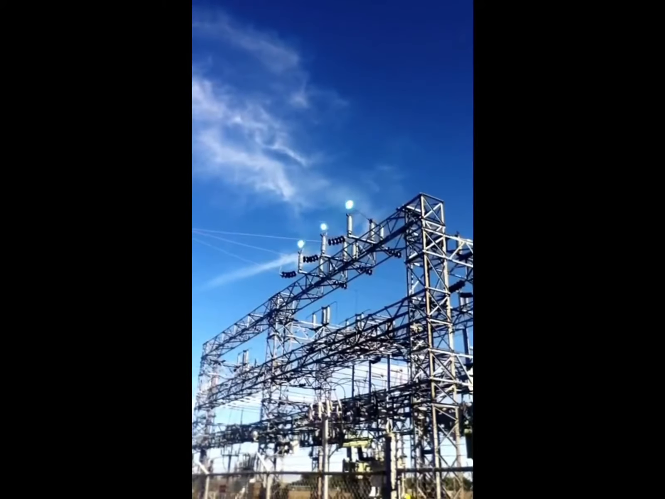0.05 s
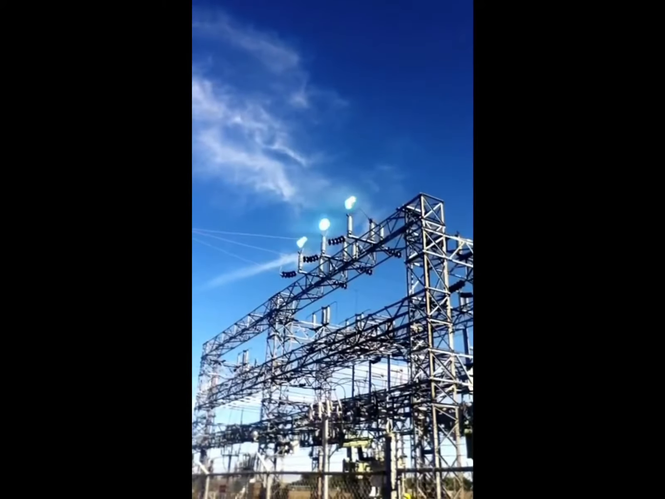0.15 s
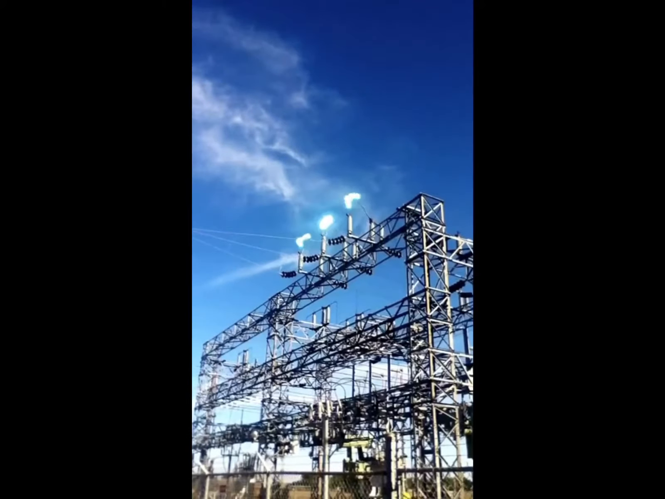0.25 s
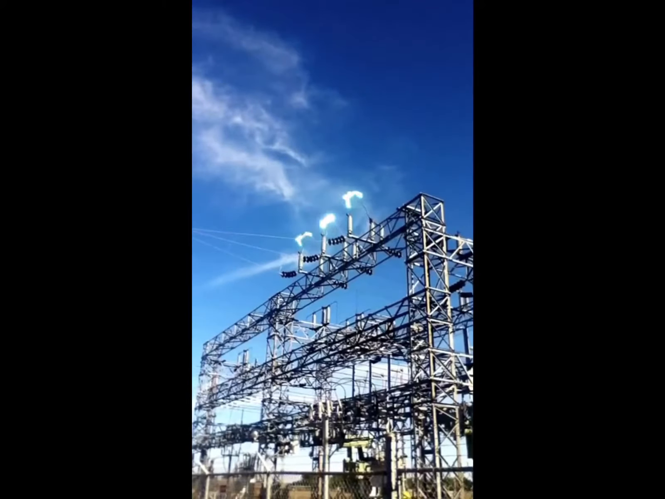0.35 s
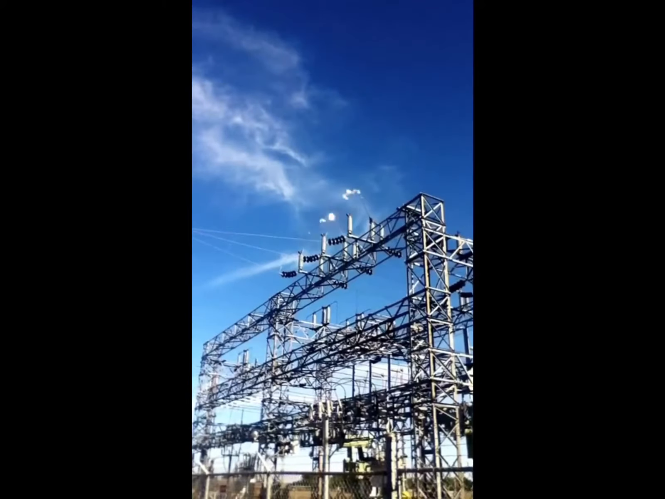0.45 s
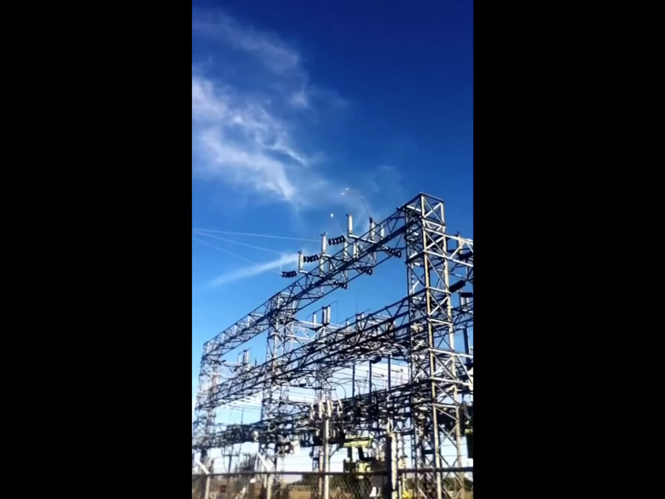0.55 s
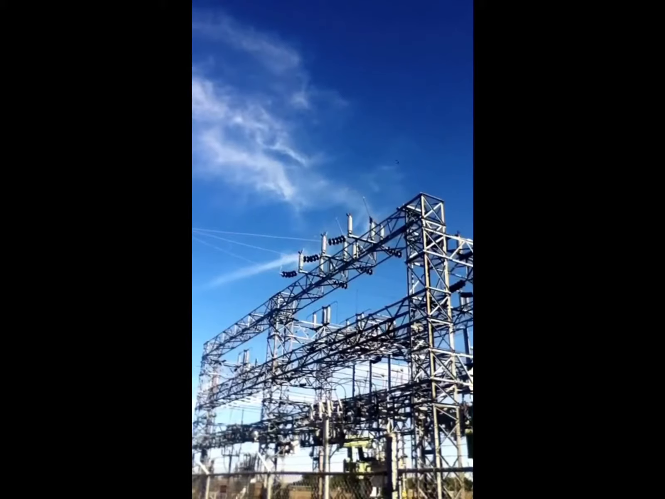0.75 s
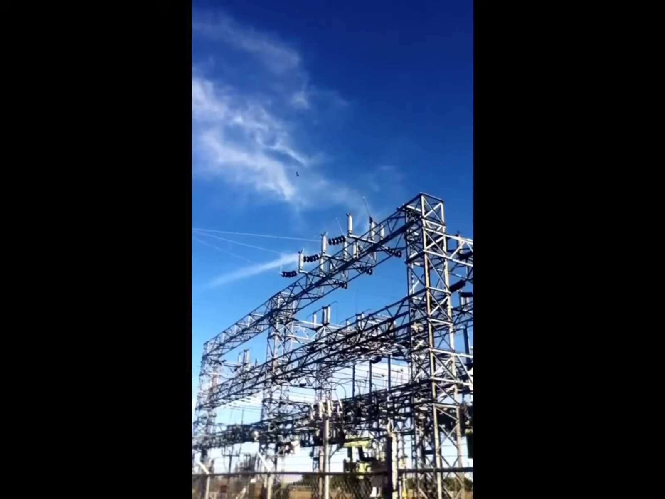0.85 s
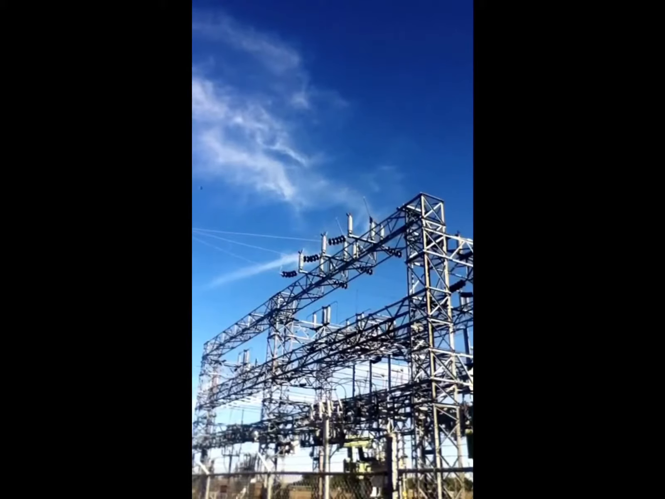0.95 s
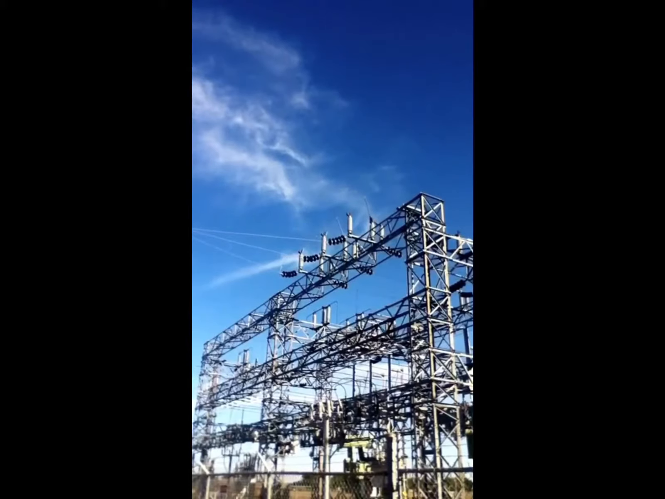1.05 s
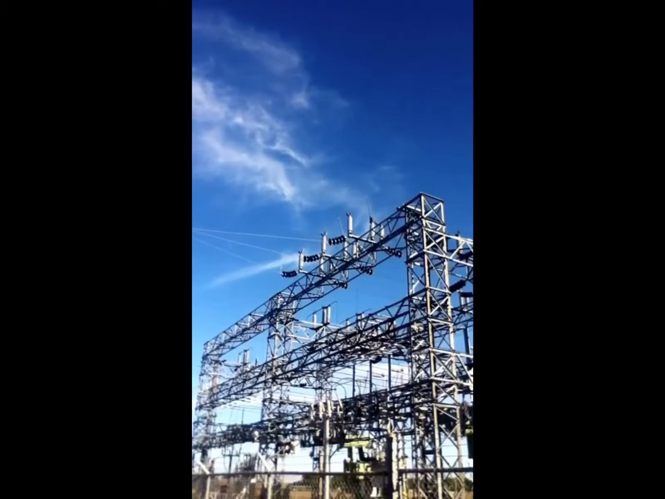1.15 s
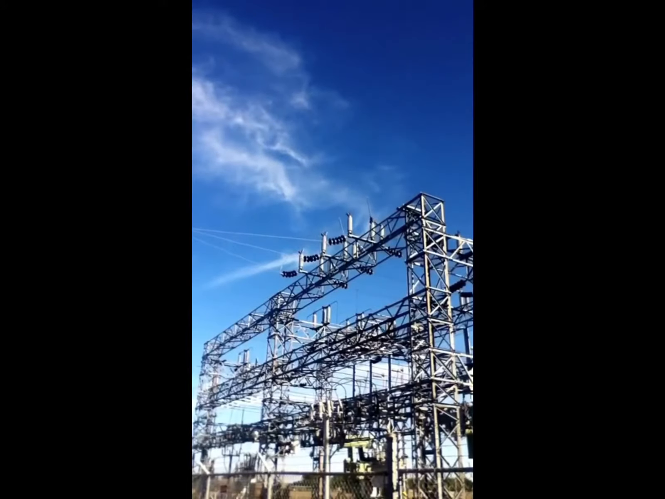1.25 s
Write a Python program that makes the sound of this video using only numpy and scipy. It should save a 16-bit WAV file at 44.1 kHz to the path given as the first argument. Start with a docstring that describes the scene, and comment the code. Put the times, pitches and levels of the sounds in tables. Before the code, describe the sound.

An electric arc crackles, swells into a loud buzz and snaps off outdoors.

```python
"""An electric arc, drawn by a high-voltage switch opening on top of an outdoor substation.
The gap whistles, strikes and crackles. As the arc lengthens, each surge of current heats the air,
giving a loud buzz at twice the mains frequency and a sizzle that pulses once a cycle. The arc falters
and snaps off; its echoes and a few last sparks die away over quiet outdoor noise."""
import sys
import numpy as np
from scipy import signal
from scipy.fft import rfft, irfft
from scipy.io import wavfile
from scipy.ndimage import uniform_filter1d, map_coordinates

SR = 44100
rng = np.random.default_rng(int(sys.argv[2]) if len(sys.argv) > 2 else 0)


def store_pcm(level_fs):
    """Save levels as 16-bit WAV."""
    pcm = np.round(np.clip(level_fs, -1, 1) * 32767).astype(np.int16)
    wavfile.write(sys.argv[1], SR, np.atleast_2d(pcm).T)


N = 57330
BUZZ_HZ, STRIKE_S, OUT_S = 119.8, .2035, .775  # surge rate; the arc's ignition and extinction
STRIKE_WIDTH_HZ = 2800


def undb(db):
    """Decibels to amplitude ratio."""
    return 10 ** (np.asarray(db) / 20)


def clock():
    """Sample times in seconds."""
    return np.arange(N) / SR


def unit(x):
    """Normalisation to rms 1."""
    return x / np.sqrt(np.mean(x ** 2))


def swell(curve):
    """Amplitude envelope through (time [s], level [dB]) points, zero outside them."""
    t = clock()
    s, db = np.array(curve).T
    return np.where((t >= s[0]) & (t <= s[-1]), undb(np.interp(t, s, db)), 0)


def colour(x, points):
    """Minimum-phase filter through (frequency [Hz], gain [dB]) points."""
    hz, db = np.array(points).T
    size = 2048
    freqs = np.maximum(np.arange(size // 2 + 1) * SR / size, 1)
    gain = undb(np.interp(np.log(freqs), np.log(hz), db))
    cepstrum = irfft(np.log(gain))
    cepstrum[1:size // 2] *= 2  # folding makes the response causal
    cepstrum[size // 2 + 1:] = 0
    return signal.fftconvolve(x, irfft(np.exp(rfft(cepstrum))))[:N]


def band(x, hz, width):
    """Two equal resonators in cascade, scaled to rms 1."""
    b, a = signal.iirpeak(hz, hz / width, fs=SR)
    return unit(signal.lfilter(b, a, signal.lfilter(b, a, x)))


def walk(hz):
    """Smooth random modulation of rms 1."""
    k = max(int(SR / hz), 2)
    steps = np.repeat(rng.standard_normal(N // k + 1), k)
    return unit(uniform_filter1d(steps, k))[:N]


def background():
    """Ambient noise: quiet outdoor air, a fading distant rush and a faint high pure tone."""
    # spectra of the air and the rush (frequency [Hz], gain [dB])
    air_colour = [(25, -30), (55, -5.5), (150, 0.5), (520, -7.5), (1150, -7), (1550, -13.5), (2100, -20),
                  (4000, -21), (4800, -14), (6000, -22.5), (15000, -30.5)]
    rush_colour = [(40, -25.5), (320, 1.5), (500, -6), (1200, -5.5), (2000, -17), (10000, -44)]
    # envelope of the rush (time [s], level [dB])
    rush_level = [(0, -37.5), (.12, -42), (.3, -39), (1.3, -66)]
    t = clock()
    air = unit(colour(rng.standard_normal(N), air_colour)) * undb(-47 + .5 * walk(12.41))
    rush = unit(colour(rng.standard_normal(N), rush_colour))
    rush *= undb(np.interp(t, *np.array(rush_level).T) + walk(27.1))
    whine = undb(-70) * unit(np.sin(2 * np.pi * 14993 * t))
    return air + rush + whine


def yard(x, t60_s=.7):
    """Reflection gives dull echoes; scattering by steelwork, which the bass passes, gives a thin tail."""
    # echoes from the yard and beyond (delay [s], gain [dB])
    paths = [(0.035, -9.5), (0.2504, -20.5), (0.446, -29.5)]
    t = clock()
    dull = signal.sosfilt(signal.butter(1, 550, fs=SR, output="sos"), x)
    echoes = sum(undb(db) * np.interp(t - delay, t, dull, left=0) for delay, db in paths)
    thin = signal.sosfilt(signal.butter(2, 300, "high", fs=SR, output="sos"), x)
    tail = rng.standard_normal(N) * np.exp(-np.log(1000) * t / t60_s)
    return echoes + undb(-21) * signal.fftconvolve(thin, tail / np.linalg.norm(tail))[:N]


def spits():
    """Brief discharges at the open contacts radiate thin puffs of hiss after the arc is out."""
    # puffs (time [s], level before filtering [dB], length [s])
    puffs = [(.9315, -40.5, .0025), (.9545, -45.5, .005), (1.126, -52, .003)]
    # their spectrum (frequency [Hz], gain [dB])
    puff_colour = [(700, -9), (2100, 1), (5000, 2.5), (8000, 3), (15000, -26)]
    t = clock()
    gate = sum(undb(db) * (t >= s) * np.exp(-((t - s) / length) ** 2 / 2) for s, db, length in puffs)
    return colour(gate * rng.standard_normal(N), puff_colour) * np.sqrt(2)


def whistles(attack_s=.008, release_s=.011):
    """The discharge sings in short tones, roughened by random frequency and amplitude modulation."""
    # tones (time [s], length [s], frequency [Hz], rms deviation [Hz], level [dB])
    tones = [(.158, .012, 2620, 120, -45), (.17, .04, 2030, 26, -31), (.211, .085, 2005, 55, -38.5),
             (.203, .007, 5260, 70, -32), (.222, .04, 1690, 25, -41), (.305, .027, 5200, 110, -42),
             (.364, .083, 1318, 25, -41.5), (.368, .089, 1900, 65, -42.5), (.393, .038, 7505, 85, -45),
             (.501, .064, 2013, 60, -45.5), (1.008, .012, 4790, 119, -51)]
    t, out = clock(), 0
    for start, length, hz, deviation, db in tones:
        attack = np.clip((t - start) / attack_s, 0, 1)
        release = np.exp(-np.maximum(t - start - length, 0) / release_s)
        tone = np.sin(2 * np.pi * np.cumsum(hz + deviation * walk(700)) / SR)
        out = out + undb(db) * attack * release * unit(tone * (1 + .3 * walk(260)))
    return out


def decay(start, decay_s):
    """Envelope of a transient: sudden onset, exponential decay."""
    age = clock() - start
    return (age >= 0) * np.exp(-np.abs(age) / decay_s)


def snaps():
    """Each large spark radiates a pressure impulse, hence a broad spectrum, with a trace of fizz."""
    # sparks (time [s], peak level [dB])
    events = [(.1925, -22.5), (.2048, -18), (.2512, -20), (.2714, -21), (.346, -24), (.6697, -26),
              (.773, -25), (.794, -31), (.8075, -33)]
    # their spectrum (frequency [Hz], gain [dB])
    snap_colour = [(300, -2), (5500, 0), (11000, -8), (15000, -19)]
    out = 0
    for s, db in events:
        fizz = undb(-14) * rng.standard_normal(N) * decay(s, decay_s=.0005)
        crack = colour(signal.unit_impulse(N, round(s * SR)) + fizz, snap_colour)
        out = out + undb(db) * crack / np.abs(crack).max()
    return out


def strike():
    """Electrical breakdown of the gap radiates a short, tearing burst of noise."""
    noise = band(rng.standard_normal(N), hz=2950, width=STRIKE_WIDTH_HZ)
    return undb(-28) * noise * decay(STRIKE_S, decay_s=.019)


def restrikes(first_s=.745, decay_s=.001):
    """Periodic re-ignition: the overstretched arc falters and cracks once in each of its last cycles."""
    t = clock()
    age = (t - first_s) % (1 / BUZZ_HZ)
    gate = (t >= first_s) * (t < OUT_S) * np.exp(-age / decay_s)
    return undb(-31) * gate * band(rng.standard_normal(N), hz=4200, width=STRIKE_WIDTH_HZ)


def zing(phase, depth):
    """The crooked arc radiates a nearly periodic ripple, in bright bands that come and go as it bends."""
    # bands (frequency [Hz], width [Hz], relative level [dB], peak time [s], spread [s])
    bright_bands = [(3380, 380, -2, .745, .033), (4600, 310, -1, .62, .18), (5720, 280, -3.5, .732, .03),
                    (6200, 250, -6, .733, .016), (8150, 480, -6, .72, .25)]
    t = clock()
    ripple = irfft(np.exp(2j * np.pi * rng.random(round(SR / BUZZ_HZ) // 2 + 1)))  # flat spectrum
    cycle = (phase / (2 * np.pi) + .003 * walk(BUZZ_HZ)) % 1
    repeated = map_coordinates(ripple, [cycle * len(ripple)], mode="grid-wrap")
    surges = repeated * np.exp(depth * np.cos(phase)) * undb(2 * walk(BUZZ_HZ))
    bands = sum(undb(db) * band(surges, hz, width) * np.exp(-((t - s) / spread) ** 2 / 2)
                for hz, width, db, s, spread in bright_bands)
    return bands * (t < OUT_S)


def sparks(phase, depth, per_s=5000, spread_db=1.5):
    """Shot noise: tiny random discharges of uneven size, strongest at each surge of current."""
    hits = (rng.random(N) < per_s / SR) * rng.choice([-1, 1], N)
    sizes = undb(spread_db * np.minimum(rng.exponential(size=N), 4))
    return hits * sizes * np.exp(depth * np.cos(phase))


def crackle(phase):
    """Modulated shot noise: sparks sputter in the short gap, then sizzle in time with the current."""
    # envelopes of the short and the long arc (time [s], level [dB])
    short_level = [(.192, -42), (.225, -37), (.26, -38.5), (.275, -35.5), (.335, -33.5), (.36, -36.5),
                   (.412, -36.5), (.455, -47.5), (.55, -46.5)]
    long_level = [(.36, -47), (.44, -50), (.65, -44.5), (.74, -39.5), (.772, -40.5), (.777, -45),
                  (.805, -45), (.84, -62)]
    # their spectra (frequency [Hz], gain [dB])
    short_colour = [(50, -47), (150, -8.5), (550, 1), (800, -12), (2100, -5.5), (4500, -7.5), (7500, -13),
                    (10000, -18), (13000, -27.5), (15000, -35)]
    long_colour = [(700, -15), (1500, -0.5), (2300, -4), (3800, -1.5), (5200, -6.5), (9200, -11.5),
                   (15000, -45)]
    sputter = unit(colour(sparks(phase, depth=.075), short_colour)) * undb(.9 * walk(BUZZ_HZ))
    sizzle = unit(colour(sparks(phase, depth=.16), long_colour)) + zing(phase, depth=.55)
    return sputter * swell(short_level) + sizzle * swell(long_level)


def partials(phase, table, smear_rad, waver_db):
    """Wavering harmonics; with smear the higher lag more, as a surge arrives from all along the arc."""
    return unit(sum(undb(db + waver_db * walk(24.45)) * np.cos(k * phase - smear_rad * k ** 2)
                    for k, db in table))


def buzz(phase):
    """Thermal expansion: each surge heats the air; a growl turns to a nasal rasp as the arc lengthens."""
    # envelopes of the harmonics and of the hot air's flutter (time [s], level [dB])
    fundamental_level = [(.3, -56), (.39, -44), (.46, -29.5), (.55, -23.5), (.68, -18), (.73, -19.5),
                         (.752, -27), (.771, -18.5), (.779, -46)]
    octave_level = [(.41, -46.5), (.47, -36.5), (.54, -26.5), (.61, -23), (.72, -29), (.771, -42),
                    (.779, -73)]
    growl_level = [(.34, -52), (.39, -38), (.47, -30), (.54, -25.5), (.61, -27), (.67, -39), (.771, -39),
                   (.779, -65)]
    rasp_level = [(.42, -49), (.53, -42.5), (.6, -38), (.68, -37), (.735, -30.5), (.755, -40), (.775, -45)]
    flutter_level = [(.3, -51), (.45, -43), (.54, -35.5), (.772, -33), (.781, -34), (.83, -55)]
    # overtones (harmonic number, relative level [dB])
    growl_partials = [(3, 0), (4, -17), (5, -18), (6, -10), (7, -12), (11, -16)]
    rasp_partials = [(4, 0), (5, -9), (9, -5.5), (12, 2), (13, 6), (14, -7.5)]
    # spectrum of the flutter (frequency [Hz], gain [dB])
    flutter_colour = [(50, -19), (85, -10.5), (160, 10), (300, 2.5), (1000, -5), (2000, -38)]
    hum = np.cos(phase) * swell(fundamental_level) + np.cos(2 * phase) * swell(octave_level)
    growl = partials(phase, growl_partials, smear_rad=.299, waver_db=1.4) * swell(growl_level)
    rasp = partials(phase, rasp_partials, smear_rad=0, waver_db=-.9) * swell(rasp_level)
    flutter = unit(colour(rng.standard_normal(N), flutter_colour)) * swell(flutter_level)
    shimmer = undb(.5 * walk(BUZZ_HZ))
    return (np.sqrt(2) * hum + growl + rasp) * shimmer + flutter


def scene():
    """Superposition of the arc's direct sound, its reflections and the background, in mono."""
    jitter_cycles = .0025 * walk(60.6)
    phase = 2 * np.pi * (BUZZ_HZ * (clock() - STRIKE_S) + jitter_cycles)
    arc = strike() + buzz(phase) + crackle(phase) + whistles() + restrikes() + snaps() + spits()
    return (arc + yard(arc) + background())[None]


def record(dry):
    """Band limiting: a steep low-pass filter removes the highest treble."""
    return signal.sosfilt(signal.ellip(10, .2, 80, 15400, fs=SR, output="sos"), dry)


dry = scene()
out = record(dry)
store_pcm(out)
```